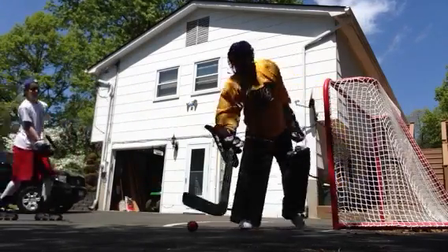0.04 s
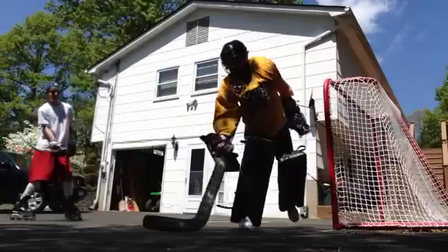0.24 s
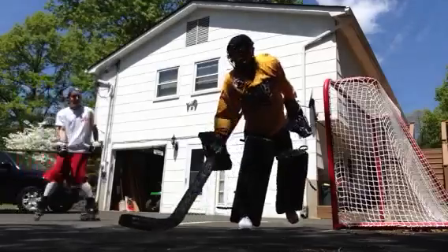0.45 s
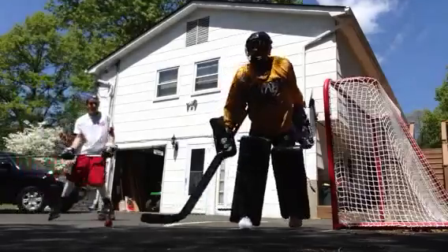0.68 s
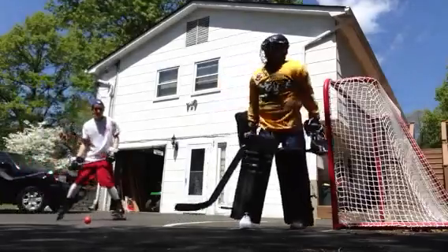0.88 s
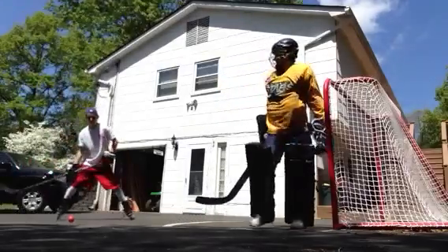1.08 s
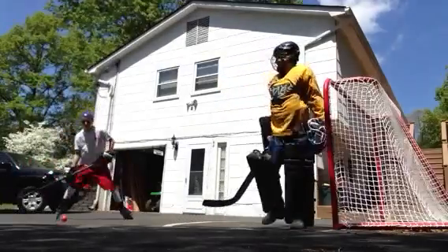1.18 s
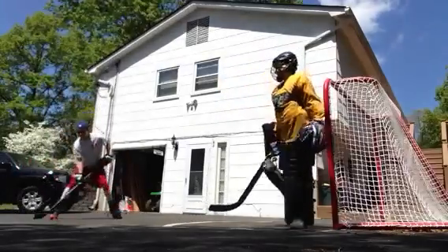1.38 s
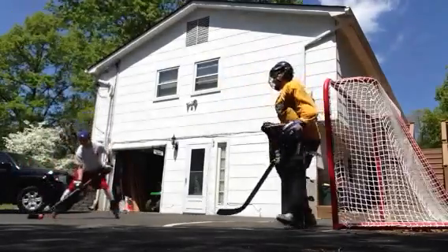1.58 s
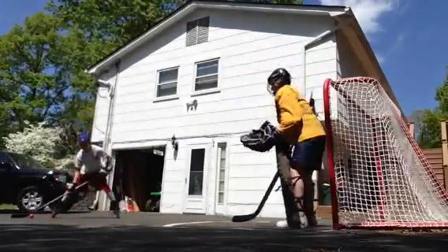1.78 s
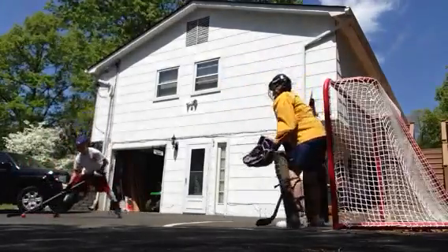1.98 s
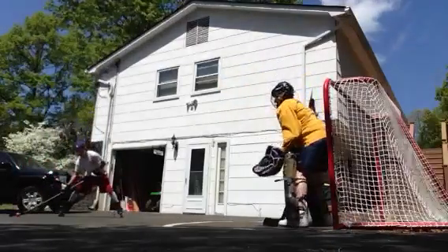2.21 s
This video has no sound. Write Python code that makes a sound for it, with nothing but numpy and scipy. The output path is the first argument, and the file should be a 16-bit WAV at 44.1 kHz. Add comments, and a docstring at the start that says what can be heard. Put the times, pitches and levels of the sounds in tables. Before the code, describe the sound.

Hockey sticks on an asphalt driveway. Quiet outdoor air and low wheel rumble open; at 0.25 s a loud, hard stick slap, then stuttering gritty scraping until about 0.63. A hollow ball knocks sharply at 0.68. After a near-quiet gap, a knock and stick hit come at 1.43-1.47, bright irregular clatter from 1.59 to 1.92, ball knocks at 1.97 and 2.07, then faint ticks. Short wall echo.

```python
"""A quiet neighbourhood floor and rumbling wheels, then a stick slap: roller hockey on an asphalt driveway.
The goalie's wide stick is a bank of decaying modes, dragged on over the grit as dense random impacts and hiss.
A hollow ball knocks (modes plus a noise crack); a farther stick sweeps into it, clacks and chatters on the ground.
Bright ticks (loose grit, the sharp onsets of a ball knock and a blade clack) and soft thuds are short enveloped
sines; the house wall and cars return a short scattered echo."""
import sys
import numpy as np
from scipy import signal
from scipy.fft import rfft, irfft
from scipy.io import wavfile
from scipy.ndimage import uniform_filter1d

SR = 44100
rng = np.random.default_rng(int(sys.argv[2]) if len(sys.argv) > 2 else 0)


def int16_out(signal):
    """Quantize to a 16-bit WAV file."""
    q = np.round(np.clip(np.atleast_2d(signal).T, -1, 1) * 32767)
    wavfile.write(sys.argv[1], SR, q.astype(np.int16))


N = 99225


def gain_of(db):
    """Decibels to amplitude gain."""
    return 10 ** (np.asarray(db) / 20)


def evened(x):
    """Scales to rms 1."""
    return x / np.sqrt(np.mean(x ** 2) + 1e-20)


def read(points, hz):
    """Reads a spectrum table on a log-frequency axis."""
    f, value = np.transpose(points)
    return np.interp(np.log(hz + 1), np.log(f + 1), value)


def coloured(x, points):
    """Filters by a spectrum table, rolled off below its first point."""
    hz = np.fft.rfftfreq(x.shape[-1], 1 / SR)
    low_cut = np.minimum(hz / points[0][0], 1) ** 2
    return irfft(rfft(x) * gain_of(read(points, hz)) * low_cut, x.shape[-1])


def add(mix, start_s, sound):
    """Mixes a sound in at a time, cut at the end of the mix."""
    part = mix[round(start_s * SR):][:len(sound)]
    part += sound[:len(part)]


# floor spectrum, relative: freq_hz, density_db_per_hz
FLOOR_SPECTRUM = [(25, -50), (117, -12), (141, -1.5), (256, 1), (489, -6.5), (796, -11), (962, -9),
                  (1160, -12), (3340, -20.5), (5880, -31), (14800, -38), (16000, -67)]
# rumble rms over time: time_s, level_db
FLOOR_LEVEL = [(0, -49), (.2, -49.5), (.35, -42.5), (.7, -49.5), (1.15, -47.5), (1.4, -48.5), (1.9, -46),
               (2.25, -42.5)]
PEBBLES_PER_S, PEBBLES_RMS_DB = 39, -63.5


def neighbourhood_floor():
    """Wheels and outdoor air as noise with uneven time-frequency patches; pebbles tick as short modes."""
    frames = N // 128 + 5
    real, imag, raw = rng.standard_normal((frames, 257, 3)).T
    flicker = evened(uniform_filter1d(raw[0], 3))  # shared by all bins
    patches = uniform_filter1d(raw, 8, 0)
    patches = evened(uniform_filter1d(patches, 10, 1))
    z = (real + 1j * imag) * gain_of(1.5 * patches + 1.2 * flicker)
    air = signal.istft(z, nperseg=512, noverlap=384)[1][:N]
    time_s, level_db = np.transpose(FLOOR_LEVEL)
    level = gain_of(np.interp(np.arange(N) / SR, time_s, level_db))
    rumble = evened(coloured(air, FLOOR_SPECTRUM)) * level

    size = gain_of(2.8 * np.minimum(rng.exponential(1, N), 4))
    size = size * (rng.random(N) < PEBBLES_PER_S / SR)
    kind, t, pebbles = rng.integers(0, 12, N), np.arange(600) / SR, np.zeros(N)
    for k, hz in enumerate(np.geomspace(500, 4500, 12)):
        tick = np.exp(-t * hz / 2) * np.sin(2 * np.pi * hz * t)
        pebbles += signal.oaconvolve(size * (kind == k), tick)[:N]
    return rumble + gain_of(PEBBLES_RMS_DB) * evened(pebbles)


ECHO_DB, ECHO_T60_S, ECHO_DELAY_S, ECHO_LOWPASS_HZ = -21, 0.28, .012, 4180


def yard_echo(x):
    """Scattered reflections from the house wall and the cars: sparse decaying taps, lowpassed."""
    t = np.arange(SR // 3) / SR
    taps = rng.choice([-1., 1.], len(t)) * (rng.random(len(t)) < 2000 / SR)
    taps = taps * gain_of(-60 * t / ECHO_T60_S) * (t > ECHO_DELAY_S)
    taps = signal.lfilter(*signal.butter(1, ECHO_LOWPASS_HZ, fs=SR), taps)
    return gain_of(ECHO_DB) * signal.oaconvolve(x, taps / np.linalg.norm(taps))[:N]


# soft low thuds, perhaps a skate or pad: start_s, level_db, pitch_hz
THUDS = [(.473, -31, 330), (1.120, -37, 270), (1.992, -26, 290)]
THUD_T60_S, THUD_RISE_S = .06, 0.0048


def thuds():
    """A soft blow: one low decaying sine with a soft onset."""
    out, t = np.zeros(N), np.arange(3000) / SR
    for start_s, level_db, pitch_hz in THUDS:
        envelope = gain_of(level_db - 60 * t / THUD_T60_S) * np.minimum(t / THUD_RISE_S, 1)
        add(out, start_s, envelope * np.sin(2 * np.pi * pitch_hz * t))
    return out


# small bright ticks: loose grit, plus the sharp onsets of a ball knock and a blade clack:
# start_s, level_db, centre_hz, width_hz
TICKS = [(0.2007, -52, 12300, 900), (0.2015, -40.5, 6900, 1500), (0.2052, -40, 7800, 600),
         (0.338, -35.5, 13000, 7000), (0.6828, -22.5, 9800, 5030), (1.6151, -12, 13200, 7040),
         (1.687, -22, 13600, 6000), (1.918, -32.5, 10900, 9000)]


def bright_ticks():
    """Loose grit and sharp onsets: a sine under a rise-and-decay envelope, shorter as the band widens."""
    out, t = np.zeros(N), np.arange(3000) / SR
    for start_s, level_db, centre_hz, width_hz in TICKS:
        x = np.pi * width_hz * t
        add(out, start_s, gain_of(level_db) * x * np.exp(1 - x) * np.sin(2 * np.pi * centre_hz * t))
    return out


SPOT_DB, SPOT_DETUNE = 1.5, 0.04  # deviations per unit of spot
SWELL_CYCLES = 0.18


def ring(modes, contact_s, pitch=1.0, tilt_db=0., spot=0.):
    """Answer of a body to one blow; a longer contact dulls it, the spot struck recolours it. Peak 1."""
    t, out = np.arange(6000) / SR, 0
    spots = spot * rng.standard_normal((len(modes), 2))
    for (mode_hz, level_db, t60_s), (spot_level, spot_pitch) in zip(modes, spots):
        level_db = level_db + SPOT_DB * spot_level + tilt_db * np.log2(mode_hz / 1500)
        decay = gain_of(level_db - 60 * t / max(t60_s, .005))
        hz = mode_hz * pitch * (1 + SPOT_DETUNE * spot_pitch)
        swell = 1 - np.exp(-t * hz / SWELL_CYCLES)
        out = out + decay * swell * np.sin(2 * np.pi * hz * t)
    contact = np.hanning(len(t[t < 2 * contact_s]) + 3)
    out = np.convolve(out, contact)[:len(t)]
    return out / abs(out).max()


# knocks of the hollow ball: start_s, level_db, pitch_factor, crack_db (relative to the ring)
KNOCKS = [(0.6823, -21, 1.03, -7), (0.716, -42, 1.23, -8), (1.433, -22.5, 1.04, -9), (1.969, -19, 1, -15),
          (2.067, -27, 0.975, -12.5)]
# ball modes at pitch_factor 1: mode_hz, level_db, t60_s
BALL_MODES = [(304, -10.5, 0.089), (448, 1.5, 0.038), (890, 9.5, 0.032), (1090, -21, 0.04),
              (1348, -4, 0.051), (2240, -0.5, .013), (4560, -37, 0.0092)]
# colour of the ball's crack: freq_hz, level_db
CRACK_SPECTRUM = [(1500, 0), (4500, -3), (5700, -20), (7500, -12), (15000, -30)]
BALL_CONTACT_S, CRACK_DECAY_S = .0001, 0.0029


def ball_knocks():
    """The struck shell rings; a decaying burst of coloured noise makes the hard crack."""
    out, t = np.zeros(N), np.arange(6000) / SR
    for start_s, level_db, pitch_factor, crack_db in KNOCKS:
        crack = evened(coloured(rng.standard_normal(6000), CRACK_SPECTRUM)) * np.exp(-t / CRACK_DECAY_S)
        body = ring(BALL_MODES, BALL_CONTACT_S, pitch_factor)
        add(out, start_s, gain_of(level_db) * (body + gain_of(crack_db) * crack))
    return out


GRIT_PER_S, GRIT_SPREAD_DB, LUMPS_DB = 4000, 4, 1.5
DRAG_CONTACT_S, FADE_S, HISS_FADE_S = .00008, .003, .0022
DAMPED, PRESSED_T60_S = 0.6, .03  # pressed blade: t60 factor, longest t60
BITE = 4.6  # size of a catch's first impact against the grit after it
SLIDE = .3  # share of the hiss that lingers between catches
# level of the hiss above TOP_HZ, before top_share: time_s, level_db
TOP_LEVEL = [(1.49, -15), (1.52, -1), (1.72, -3), (1.8, -11), (2.05, -13)]
TOP_HZ = 11360


def scrape(catches, modes, hiss_spectrum, rise_s, sag_s, top_share=0):
    """Dense uneven grit impacts ring the blade and hiss while it touches the ground."""
    t, body_out, hiss_level = np.arange(3000) / SR, np.zeros(N), np.zeros(N)
    grit = gain_of(GRIT_SPREAD_DB * np.minimum(rng.exponential(1, N), 3)) * rng.choice([-1, 1], N)
    grit = evened(grit * (rng.random(N) < GRIT_PER_S / SR))
    lumps = gain_of(LUMPS_DB * evened(uniform_filter1d(rng.standard_normal(N), size=130)))
    grit = evened(grit * lumps)
    pressed = np.multiply(modes, [1, 1, DAMPED])
    pressed[:, 2] = np.minimum(pressed[:, 2], PRESSED_T60_S)

    for start_s, level_db, length_s, hiss_db, tilt_db in catches:
        touch = np.clip(t / rise_s, 0, 1) * np.exp(-np.minimum(t, length_s) / sag_s)
        after_s = np.maximum(t - length_s, 0)
        body = ring(pressed, DRAG_CONTACT_S, tilt_db=tilt_db, spot=1.0)
        impacts = grit[round(start_s * SR):][:len(t)]
        power = np.mean(impacts[:round((length_s + FADE_S) * SR)] ** 2)
        impacts = impacts / np.sqrt(power + 0.037)
        impacts[round(rise_s * SR)] += BITE
        impacts = (touch * np.exp(-after_s / FADE_S))[:len(impacts)] * impacts
        rung = signal.fftconvolve(impacts, body / np.linalg.norm(body))
        add(body_out, start_s, .5 * gain_of(level_db) * rung)
        hiss_shape = 0.94 * np.exp(-after_s / HISS_FADE_S) + np.exp(-t / 0.00046)  # catch + initial spit
        add(hiss_level, start_s, gain_of(level_db + hiss_db) * touch * hiss_shape)

    hiss = evened(coloured(.5 * grit + lumps * rng.standard_normal(N), hiss_spectrum))
    hz, frames_s, z = signal.stft(hiss, SR, nperseg=256)
    patches = uniform_filter1d(rng.standard_normal(z.shape), size=9, axis=0)
    patches = evened(uniform_filter1d(patches, size=4, axis=1))
    top_db = top_share * np.interp(frames_s, *np.transpose(TOP_LEVEL))
    z = z * gain_of(3.3 * patches + (hz[:, None] > TOP_HZ) * top_db)
    hiss = signal.istft(z, SR, nperseg=256)[1][:N]
    hiss_level = hiss_level + SLIDE * signal.lfilter([.001], [1, -.999], hiss_level)
    return body_out + hiss_level * hiss


# far blade on the ground: start_s, level_db, length_s, hiss_db (re level_db), tilt_db_per_octave
CLACKS = [(1.433, -24.5, 0.017, -10.5, -14), (1.590, -21.5, 0.005, -22, 3), (1.6125, -27, 0.0023, -9, 0),
          (1.6155, -25, 0.0063, -11.5, -4), (1.644, -28, 0.0074, -9, 3), (1.6635, -27.5, 0.0083, -2, 4),
          (1.675, -33, 0.006, -5, 15), (1.6865, -28.5, 0.0048, -8.5, 15), (1.6995, -27.5, 0.01, -9, 21),
          (1.7155, -27, 0.007, -9, 4), (1.729, -30.5, 0.029, -6, 12), (1.777, -30, 0.013, -12, -12),
          (1.790, -23, 0.026, -13.5, 7), (1.819, -30, 0.0073, -15, 23.5), (1.8365, -26.5, 0.015, -17, 3),
          (1.8515, -25, 0.012, -19, 6), (1.8685, -24.5, 0.0086, -14, 9), (1.883, -31.5, 0.019, -11.5, 6),
          (1.916, -33.5, 0.0033, -12, -7), (2.070, -40.5, 0.016, -1, 13), (2.102, -38.5, 0.0076, -6, 6),
          (2.146, -36, 0.006, 0.5, 7), (2.212, -31, 0.0018, -11, -1)]
# far blade modes before pressing: mode_hz, level_db, t60_s
FAR_MODES = [(330, -26, 0.054), (1346, -3.5, 0.057), (1750, 6.5, 0.015), (2026, 0.5, 0.088),
             (2420, 9, 0.028), (2580, 8, 0.03), (2864, 4, 0.026), (3600, -20, 0.01), (4780, -3.5, 0.026)]
# far hiss colour, also for the shot: freq_hz, level_db
FAR_HISS = [(4000, -2.5), (6100, -19.5), (7000, -15), (8500, -14.5), (10800, -24), (12500, -7.5),
            (15200, -7.5)]


def far_blade_clacks():
    """Short ground contacts of the far blade, each ringing and hissing."""
    return scrape(CLACKS, FAR_MODES, FAR_HISS, rise_s=0.00043, sag_s=0.015, top_share=1)


# far stick into the ball and on: start_s, level_db, length_s, hiss_db (re level_db), tilt_db_per_octave
SHOT = [(1.4745, -16, 0.0081, -30, 4.5), (1.49, -31, 0.018, -22, -3), (1.515, -37, .07, -15.5, 2)]
# far shaft modes before pressing: mode_hz, level_db, t60_s
SHAFT_MODES = [(336, -11.5, 0.057), (680, -11.5, .03), (1240, 1, 0.016), (1720, 0.5, 0.021),
               (2046, 0.5, 0.027), (2440, -0.5, 0.018), (2960, 4, 0.012), (3630, -15, 0.011),
               (4250, -7.5, 0.013)]
NEAR_SAG_S = 0.1  # shared with the goalie's drag


def far_shot():
    """The far stick sweeps into the ball and drags on; grit impacts ring its shaft."""
    return scrape(SHOT, SHAFT_MODES, FAR_HISS, rise_s=0.001226, sag_s=NEAR_SAG_S, top_share=0.75)


# near blade catching on asphalt: start_s, level_db, length_s, hiss_db (re level_db), tilt_db_per_octave
DRAG = [(.249, -23.5, 0.0068, -23, 4.5), (.288, -21, 0.031, -28.5, -0.5), (.346, -22.5, 0.017, -24.5, 1),
        (.364, -28, 0.01, -21, 5), (.377, -20.5, 0.012, -24, 3), (.395, -19.5, 0.017, -26.5, 1),
        (.421, -22.5, 0.01, -24, 0.5), (.440, -26.5, 0.0062, -24, -2.5), (.458, -29, 0.02, -32, -0.5),
        (.487, -21.5, 0.017, -28, 2), (.505, -19, 0.0098, -25, 1), (.518, -24, 0.012, -20, 0.5),
        (.532, -21.5, 0.011, -20.5, 1), (.552, -24.5, 0.0077, -23, 0.5), (.592, -23.5, 0.012, -23, -0.5),
        (.613, -31, 0.011, -24, 2.5)]
# near stick modes, pressed in the drag, free in the slap: mode_hz, level_db, t60_s
NEAR_MODES = [(285, -23, 0.05), (377, 9, 0.025), (470, -5, 0.05), (720, -17.5, 0.21), (780, -5.5, 0.05),
              (986, -4, 0.077), (1192, 11.5, 0.012), (1410, 10.5, 0.018), (1650, -5, 0.073),
              (2500, -4, 0.044), (3045, 9, 0.02), (3330, 7, 0.022), (4200, -6.5, 0.016),
              (5200, -7.5, 0.016)]
# near hiss colour: freq_hz, level_db
NEAR_HISS = [(2000, 8), (5500, 2.5), (7000, 1), (9500, -10), (13500, -6.5), (15200, -3)]


def goalie_drag():
    """The wide blade catches on the grit again and again; each catch rings and hisses."""
    return scrape(DRAG, NEAR_MODES, NEAR_HISS, rise_s=0.00072, sag_s=NEAR_SAG_S)


# slap of the near stick: start_s, level_db
SLAP = [(.2475, -5)]
SLAP_CONTACT_S = 0.00021


def goalie_slap():
    """One blow on the ground rings the free modes of the wide stick."""
    out = np.zeros(N)
    for start_s, level_db in SLAP:
        add(out, start_s, gain_of(level_db) * ring(NEAR_MODES, SLAP_CONTACT_S))
    return out


BASS_CUT_HZ = 205


def scene():
    """Sticks and ball, which radiate little bass, in the yard over the floor."""
    play = thuds() + bright_ticks() + ball_knocks()
    play = play + far_blade_clacks() + far_shot() + goalie_drag() + goalie_slap()
    play = signal.sosfilt(signal.butter(6, BASS_CUT_HZ, "high", fs=SR, output="sos"), play)
    return (neighbourhood_floor() + yard_echo(play) + play)[None]


# treble roll-off: freq_hz, level_db
TREBLE_ROLLOFF = [(20, 0), (15100, 0), (15350, -22), (16300, -45)]
EDGE_HZ = 16371


def record(dry):
    """The top of the treble rolls off, then the band limit."""
    band_limit = signal.firwin(511, EDGE_HZ, window=("kaiser", 9), fs=SR)
    return signal.oaconvolve(coloured(dry, TREBLE_ROLLOFF), band_limit[None], "same")


dry = scene()
out = record(dry)
int16_out(out)
```